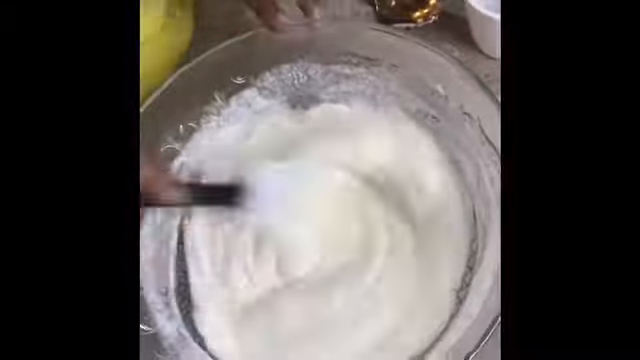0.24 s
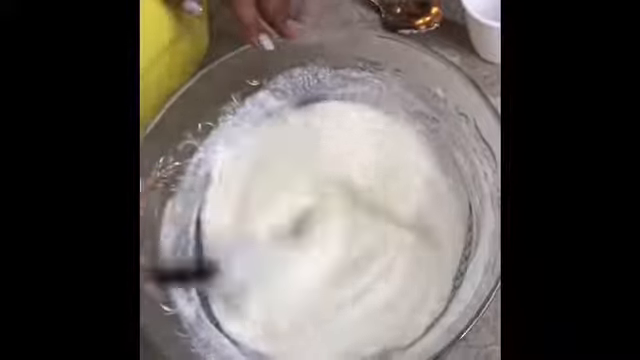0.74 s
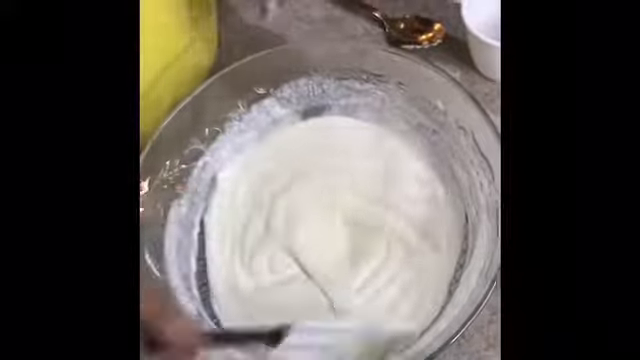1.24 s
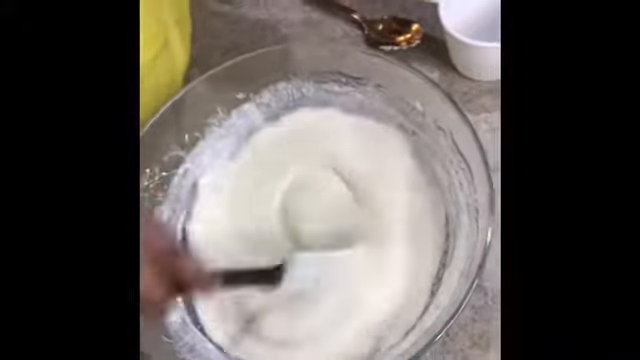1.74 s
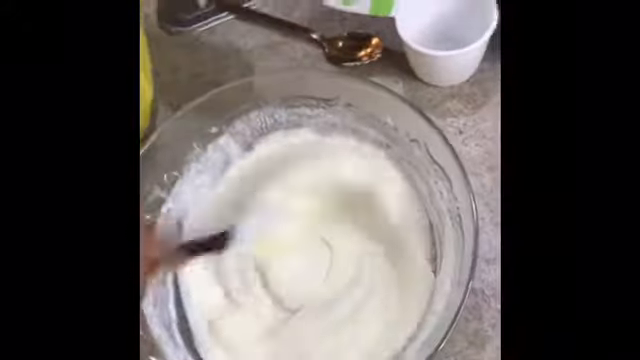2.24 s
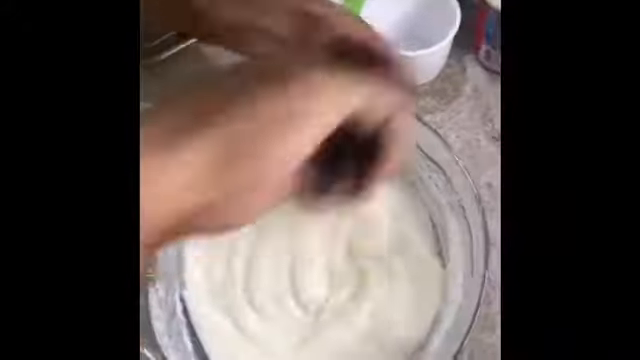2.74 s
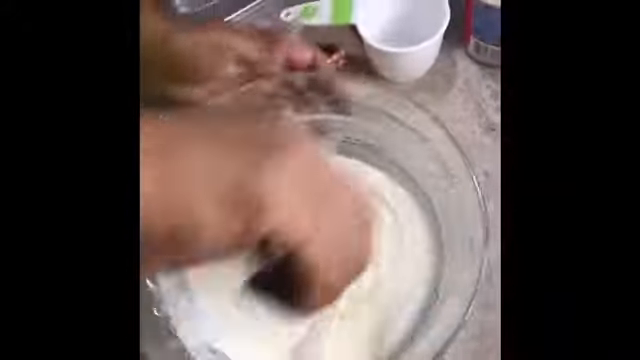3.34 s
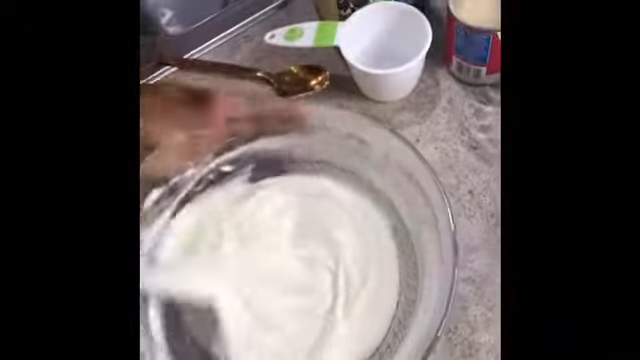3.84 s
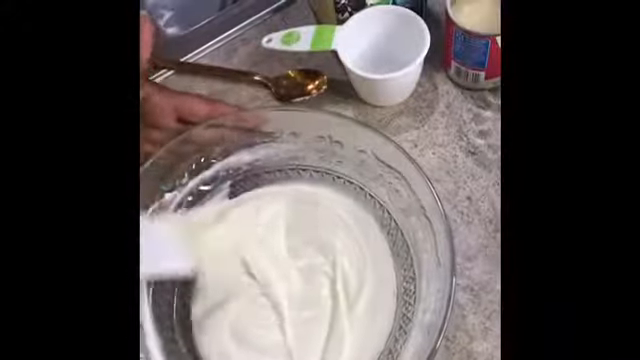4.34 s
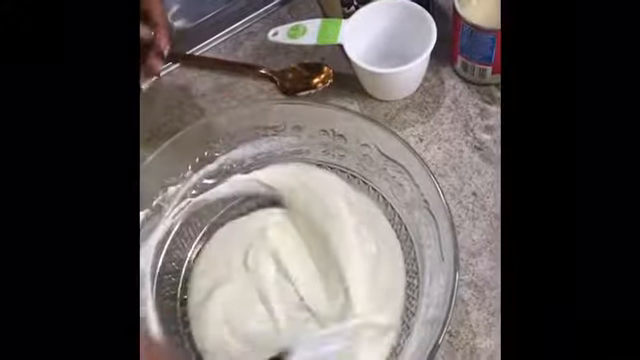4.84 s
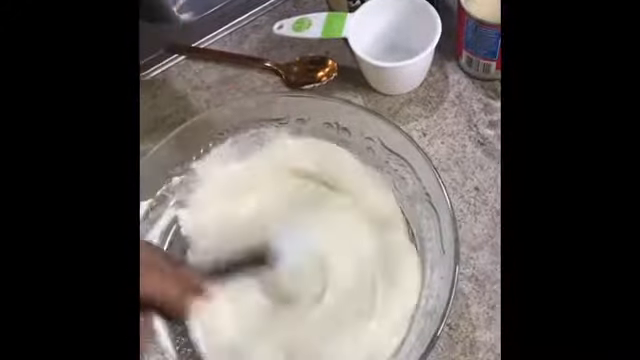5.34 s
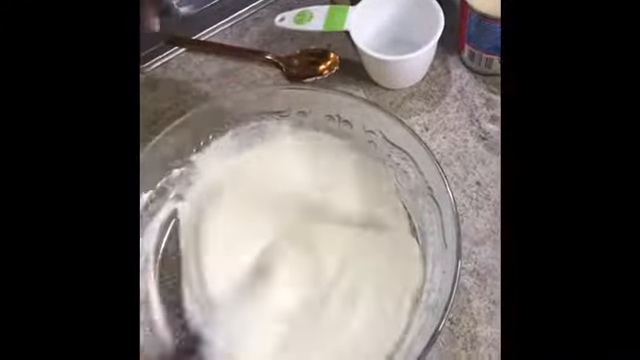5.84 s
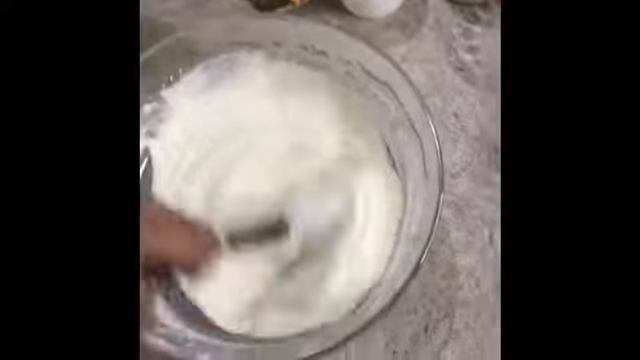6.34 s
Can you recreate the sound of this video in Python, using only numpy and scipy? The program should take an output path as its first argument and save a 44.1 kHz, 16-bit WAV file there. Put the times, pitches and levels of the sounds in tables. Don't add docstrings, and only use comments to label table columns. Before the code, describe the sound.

Close up in a small home kitchen, a spatula handle knocks a batter-damped glass bowl in irregular hollow clinks, mostly in the first two and a half seconds. Two soft rubbery scrapes follow mid-way, then one hardest knock and tiny wet smacks. The hand-held microphone thumps, rumbles and jolts over low hum, hiss and a high bird whistle.

```python
import sys
import numpy as np
from scipy import signal
from scipy.fft import rfft, irfft, next_fast_len
from scipy.io import wavfile
from scipy.ndimage import uniform_filter1d, map_coordinates

SR = 44100
rng = np.random.default_rng(int(sys.argv[2]) if len(sys.argv) > 2 else 0)


def persist_wave(psi):
    counts = np.round(np.clip(psi, -1, 1) * 32767).astype(np.int16)
    wavfile.write(sys.argv[1], SR, np.atleast_2d(counts).T)


def invert_db(x):
    u = np.asarray(x, float) / 20
    return 10 ** u


N = 290616
T = np.arange(N) / SR


def unit(x):
    return x / np.sqrt(np.mean(x ** 2) + 1e-20)


def along(points, hz):
    f, v = np.transpose(points)
    return np.interp(np.log(hz + .1), np.log(f + .1), v)


def curves(rows):
    s, *cols = np.transpose(rows)
    return [np.interp(T, s, c) for c in cols]


def wobble(rate):
    return map_coordinates(rng.standard_normal(400), [T * np.clip(rate, .1, 50)])


def filtered(x, response):
    m = next_fast_len(len(x) + SR // 2)
    return irfft(rfft(x, m) * response(np.fft.rfftfreq(m, 1 / SR)), m)[:len(x)]


def noise(spectrum):
    return unit(filtered(rng.standard_normal(N), lambda hz: invert_db(along(spectrum, hz))))


def streaky(spectrum, streak_db):
    z = signal.stft(noise(spectrum), nperseg=1024)[2]
    field = uniform_filter1d(rng.standard_normal(z.shape), size=2, axis=0)
    field = uniform_filter1d(field, size=16, axis=1)
    return unit(signal.istft(z * invert_db(streak_db * unit(field)), nperseg=1024)[1][:N])


def resonance(f, hz, width):
    return 1j * f * width / (hz * hz - f * f + 1j * f * width)


def add(track, s, x):
    part = track[round(s * SR):][:len(x)]
    part += x[:len(part)]


def kitchen(x, wet_db):
    # pitch_hz, t60_s
    decay = [(200, 0.65), (800, 0.3), (3000, 0.21), (10000, 0.2)]
    hz, t, z = signal.stft(rng.standard_normal(len(x)), SR, nperseg=256)
    fading = z * invert_db(-60 * t / along(decay, hz)[:, None])
    tail = signal.istft(fading, SR, nperseg=256)[1]
    late = np.pad(tail / np.linalg.norm(tail), (150, 0))
    return x + invert_db(wet_db) * signal.fftconvolve(x, late)[:len(x)]


def knocks():
    # ring_db, rattle_db, crack_db
    rim_hits = [
        (0.0872, -33, -4.5, -9, -17.5),
        (0.449, -20, -1, -8, -26),
        (0.7862, -31.5, -3, -0.5, -12.5),
        (1.72, -21.5, -4.5, -10.5, -37),
        (2.0624, -26, 2, -9.5, -22),
        (2.397, -25, -3.5, -6, -17),
        (5.249, -18, -4, -11.5, -33),
    ]
    # pitch_hz, width_hz, level_db
    modes = [(786, 66, 24), (546, 43, 0), (1154, 150, 7.5), (1613, 61, -5.5), (2460, 290, -1),
             (4600, 590, 2)]
    ring_hz, split_hz = 787, 48.6
    sag, sag_s = .1, 0.0393
    lowest_hz = 444
    contact_s = .0008

    def bowl(f):
        return sum((-1) ** k * invert_db(g) * resonance(f, c, w) for k, (c, w, g) in enumerate(modes))

    out, t = np.zeros(N), T[:SR // 2]
    click = np.arange(len(t)) == round(contact_s * SR)
    for s, db, ring_db, rattle_db, crack_db in rim_hits:
        push = -np.exp(-((t - contact_s) / .00008) ** 2)
        body = filtered(push, bowl)

        pitch = ring_hz * (1 - sag * (1 - np.exp(-t / sag_s)) + 0.026 * wobble(50)[:len(t)])
        turn = 2 * np.pi * np.cumsum(pitch) / SR
        pair = np.sin(turn) + .6 * np.sin(turn - 2 * np.pi * (split_hz * t + rng.random()))
        decay = invert_db(-22.5 - 60 * t / 0.34 + 1.25 * wobble(55)[:len(t)])
        linger = decay * pair * (1 - np.exp(-t / 0.0039)) ** 2

        grit = rng.standard_normal((2, len(t))) * (t > contact_s)
        chatter = grit[0] * invert_db(-60 * t / 0.0073) + 0.83 * click
        rattle = 1.5 * filtered(chatter, lambda f: resonance(f, 2900, 4600) ** 2)
        snap = click + .3 * grit[1] * invert_db(-60 * np.abs(t - contact_s) / .002)
        crack = filtered(snap, lambda f: resonance(f, 8000, 14000) ** 2)

        hit = invert_db(2) * push + invert_db(ring_db + 3.5) * (body / np.abs(body).max() + linger)
        hit += invert_db(rattle_db + 7) * rattle
        bright = invert_db(crack_db + 24) * kitchen(crack, wet_db=-13.0)
        add(out, s, invert_db(db) * (kitchen(hit, wet_db=-9.5) + bright))
    return filtered(out, lambda f: f ** 6 / (f ** 6 + lowest_hz ** 6))


def rocking():
    # start_s, length_s, level_db
    swells = [
        (.44, 0.14, -60.5),
        (1.72, 0.14, -63),
        (2.058, 0.22, -61),
        (2.39, 0.23, -64.5),
        (2.753, 0.099, -66),
        (4.798, 0.052, -62),
        (5.16, 0.31, -60.5),
    ]
    out = np.zeros(N)
    for s, length, db in swells:
        t = T[:round(length * SR)]
        swell = np.sin(np.pi * np.sqrt(t / length))
        add(out, s, invert_db(db + 4.0) * swell * np.sin(2 * np.pi * 452 * t))
    return out


def scrape():
    # start_s, hardest_s, end_s, rub_db, swish_db
    strokes = [
        (2.898, 3.248, 3.45, -57.5, -61.5),
        (3.547, 3.75, 3.97, -56.5, -62.5),
        (4.078, 4.284, 4.45, -65.5, -72),
    ]
    # pitch_hz, level_db (per Hz)
    rub_colours = [
        [(180, -47), (300, -1), (622, -3), (715, 3), (1070, -6), (1510, -1), (1820, -6.5), (2080, -16),
         (2800, -28), (3640, -51), (6160, -120)],
        [(180, -37), (300, -30), (375, 0), (541, -13), (582, -5), (879, -7), (983, -3.5), (1400, -13.5),
         (2800, -20.5), (3640, -35), (6160, -120)],
    ]
    # pitch_hz, level_db (per Hz)
    swish_colour = [(1650, -10), (2800, -4), (3590, 2), (3970, -4), (5560, -3), (7330, -19), (8930, -8),
                    (14000, -18), (16000, -12)]
    rub_hz, bend_hz = 1487, 150
    ease_db, swish_ease_db = 11, 13
    swish_lead_s = 0.053
    out = np.zeros(N)
    for (start, hard, end, rub_db, swish_db), colour in zip(strokes, rub_colours + rub_colours[1:]):
        press = np.interp(T, [start, hard, end], [0, 1, 0])
        speed = np.interp(T + swish_lead_s, [start, hard, end], [0, 1, 0])
        fade = np.clip(np.minimum(T - start, end - T) / 0.05, 0, 1)

        grains = rng.standard_normal(N) * invert_db(4.4 * rng.standard_normal(N))
        broad = unit(filtered(grains, lambda f: invert_db(along(colour, f))))
        carrier = np.cos(2 * np.pi * np.cumsum(rub_hz + bend_hz * press) / SR)
        band = unit(noise([(1, 18.5), (90, 0), (300, -17), (900, -120)]) * carrier)
        rub = invert_db(rub_db - ease_db * (1 - press)) * (invert_db(3.0) * broad + invert_db(-5.0) * band)

        swish = unit(filtered(grains, lambda f: invert_db(along(swish_colour, f))))
        swish = invert_db(swish_db - swish_ease_db * (1 - speed)) * swish
        out += fade * invert_db(1.2 * wobble(40)) * (rub + swish)
    return out


def smacks():
    # start_s, peak_db, pitch_hz,
    # sharpness_q
    pops = [(0.39, -52, 7160, 0.48), (1.082, -43, 7500, 0.4), (1.1386, -55, 7490, 1.2),
            (1.226, -49, 7200, 1), (1.5878, -54, 9300, 2.4), (1.696, -56, 7630, 1.8),
            (1.7374, -50, 8650, 2), (2.0875, -46, 7750, 1.1), (2.3625, -58, 8910, 2.6),
            (3.061, -41, 8800, 3.3), (5.27, -43, 8400, 3.3), (5.5887, -46.5, 8640, 2.5),
            (5.6298, -46, 9200, 3), (5.689, -45, 9150, 1.6), (5.912, -50, 8100, 4), (5.922, -54, 9200, 2),
            (6.2794, -58, 7260, 1.3), (6.5085, -44, 8750, 2.5),
            (1.6242, -52, 5570, 2),
        (2.0622, -42, 4400, 4),
        (2.403, -37.5, 4800, 3.1),
        (2.4447, -53, 4770, 1.6),
        (2.849, -43, 3360, 0.62),
        (4.3446, -44, 4600, 4.4),
        (4.542, -56, 684, .7),
        (5.2704, -44.5, 5570, 1.9),
        (5.453, -51, 4080, 4.7),
        (5.5935, -53, 3540, 1.6),
            (0.91, -70, 1630, 49), (2.287, -54.5, 1200, 1.5), (2.46, -53, 1160, 2.7),
             (3.414, -55, 2134, 1.4), (4.047, -60.5, 1140, 4.9), (5.589, -46.5, 1500, 0.42),
             (5.596, -42, 1380, 0.58), (5.598, -58, 780, 11), (5.630, -56.5, 1770, 3.4),
             (5.70, -62, 1210, 5), (5.74, -58, 1100, 1.8), (5.797, -56.5, 880, 7.3),
             (5.798, -62.5, 1650, 8), (5.808, -58.5, 1750, 8.8), (5.819, -58, 1490, 6),
             (5.923, -50, 2500, 0.5)]
    out, t = np.zeros(N), T[:SR // 4]
    for s, db, hz, sharpness in pops:
        spit = (t == 0) + 0.073 * rng.standard_normal(len(t)) * np.exp(-t / 0.0013)
        width = hz / np.clip(sharpness, .3, 40)
        burst = filtered(spit, lambda f: resonance(f, hz, width) ** 2)
        add(out, s + 0.00092, invert_db(db + 6.5) * kitchen(burst / np.abs(burst).max(), wet_db=-11))
    return out


def hand():
    # start_s, peak_db, pitch_hz
    thumps = [(0.445, -38, 94), (1.549, -49, 123), (1.891, -54, 86.1), (2.447, -48, 90.5), (3.005, -52, 89),
              (3.64, -46.5, 88), (3.22, -44.5, 150), (3.757, -42.5, 150), (3.849, -48, 130),
              (4.095, -67, 86.6), (4.598, -60, 70), (4.75, -56, 120), (4.969, -48, 73), (5.317, -39.5, 100),
              (5.611, -53, 86), (5.957, -45, 101), (6.298, -53, 85.5)]
    out, t = np.zeros(N), T[:SR // 8]
    for s, db, hz in thumps:
        u = t * hz / 0.98
        puff = unit(filtered(rng.standard_normal(len(t)), lambda f: resonance(f, 2.03 * hz, 570) ** 2))
        swing = np.sin(2 * np.pi * hz * t)
        add(out, s, invert_db(db + 4) * u * np.exp(-u) * (swing + 0.37 * puff))
    return out


def jolts():
    # start_s, step (pressure), rise_ms, return_ms
    slips = [
        (1.755, -0.074, 1.7, 19),
        (2.295, -0.0094, 1.2, 23),
        (2.7432, -0.038, 0.0091, 1.4),
        (2.785, -0.019, 0.49, 7.6),
        (2.813, -0.027, 0.64, 4.4),
        (2.849, 0.043, 0.39, 11),
        (2.854, -0.086, 1.6, 9.7),
        (4.54, 0.045, 0.73, 27),
        (4.5429, -0.00022, 0.13, 15),
        (4.56, -0.11, 5, 25),
    ]
    lead_s = .01
    out, t = np.zeros(N + SR), T[:SR // 4] - lead_s
    for s, step, rise_ms, back_ms in slips:
        u = 1000 * t / rise_ms
        rise = (1 + np.tanh(u)) / 2
        leak = np.exp(-np.logaddexp(0, u) * rise_ms / back_ms)
        add(out, s - lead_s, step * rise * leak)
    return out[:N]


def arm_sway():
    # start_s, sway_db, grip_db
    arm_moves = [(0, -26.5, -54), (.5, -21, -48.5), (.85, -21.5, -52), (1.35, -18.5, -56), (1.7, -31, -54),
                 (2.2, -24, -45), (2.55, -23, -56.5), (3.05, -34, -51.5), (3.3, -35.5, -59),
                 (3.7, -32, -57), (4.3, -37, -58.5), (4.55, -25.5, -52.5), (5.25, -31, -47.5),
                 (5.8, -22, -51.5), (5.97, -34.5, -48), (6.12, -19, -47), (6.59, -22, -50)]
    # pitch_hz, level_db (per Hz)
    sway_colour = [(.5, -37), (2, -0.5), (4, 5.5), (7, -16), (12, -17), (20, -9.5), (30, -120)]
    # pitch_hz, level_db (per Hz)
    grip_colour = [(12, -44), (22, 6.5), (40, -8), (80, -15.5), (150, -28), (300, -36), (500, -120)]
    sway_db, grip_db = curves(arm_moves)
    arm = np.sqrt(2) * np.sin(2 * np.pi * np.cumsum(3.4 + 1.1 * wobble(2)) / SR)
    sway = invert_db(np.minimum(sway_db, -16)) * unit(arm + .5 * noise(sway_colour))
    rumble = invert_db(grip_db + 5.5 + 3.3 * wobble(12)) * noise(grip_colour)
    low = 0.36 * np.tanh(sway / 0.25) + rumble
    return low * np.clip((T[-1] - T) / .05, 0, 1)


def room_tone():
    # pitch_hz, level_db (per Hz)
    hum_colour = [(59, -22), (100, -1.5), (223, -7), (286, -5), (496, -12), (595, -10.5), (1030, -19.5),
                  (1380, -22.5), (1720, -26), (2300, -34), (2990, -28), (5060, -120)]
    # pitch_hz, level_db (per Hz)
    hiss_colour = [(1060, -17), (1800, -13.5), (2120, -4.5), (3610, 3), (4170, 2), (5910, 3), (8280, -6.5),
                   (15100, -10), (16000, -10.5)]
    # start_s, end_s, pitch_hz, level_db, width_hz
    whines = [
        (0, 5.2, 1385, -78, 20),
        (1.4, 2.9, 9400, -83, 90),
        (1.5, 3.3, 8600, -84, 60),
        (2.3, 3.2, 8950, -83, 60),
        (3.3, 4.3, 9550, -84, 60),
        (3.8, 5.3, 8820, -81, 40),
        (4.0, 5.0, 9050, -80, 40),
        (5.3, 6.0, 9600, -83, 60),
    ]
    hum_db, hiss_db, rise_db, rise_s = -58, -70, 6, 4.35
    hiss_level_db = hiss_db + rise_db * np.clip(T / rise_s, 0, 1)
    room = invert_db(hum_db + 1.1 * wobble(5)) * streaky(hum_colour, streak_db=2.6)
    room += invert_db(hiss_level_db + 1.5 + .8 * wobble(9)) * streaky(hiss_colour, streak_db=2.4)
    for start, end, hz, db, width in whines:
        fade = np.clip(np.minimum(T - start, end - T) / 0.16, 0, 1)
        swell = invert_db(db - 0.5 + 3.9 * wobble(9)) * fade
        room += swell * unit(filtered(rng.standard_normal(N), lambda f: resonance(f, hz, width) ** 2))
    return room


def bird():
    # start_s, trill_db, note_db, pitch_hz
    calls = [
        (.46, -69, -45, 7480),
        (0.946, -69, -46, 7470),
        (1.991, -72, -54, 7440),
        (3.49, -68, -53, 7400),
        (3.919, -71, -64, 7200),
        (4.92, -70, -55, 7400),
        (6.03, -68, -67, 7400),
    ]
    out, t = np.zeros(N), T[:SR // 4]
    for s, trill_db, note_db, hz in calls:
        buzz = unit(filtered(rng.standard_normal(len(t)), lambda f: resonance(f, hz, 530) ** 2))
        trill = np.sin(np.pi * np.clip(t / 0.097, 0, 1)) * buzz
        u = np.clip(t - .093, 0, 1)
        pitch = hz * (1.02 - 0.44 * np.exp(-u / 0.00264))
        swell = u / 0.05 * np.exp(1 - u / 0.0097)
        note = swell * np.sin(2 * np.pi * np.cumsum(pitch) / SR)
        add(out, s, kitchen(invert_db(trill_db) * trill + invert_db(note_db) * note, wet_db=-8))
    return out


def scene():
    stirring = knocks() + rocking() + scrape() + smacks()
    holding = hand() + jolts() + arm_sway()
    return (stirring + holding + room_tone() + bird())[None]


def band_limit(x):
    return signal.sosfilt(signal.butter(12, 16920, fs=SR, output="sos"), x)


def record(dry):
    # start_s, peak_db
    dropouts = [
        (0.1737, -20),
        (1.498, -22),
        (4.1457, -35.5),
        (5.469, -29),
    ]
    # pitch_hz, level_db
    mic = [(8000, 0.5), (12000, -3.5), (15400, -5.5), (15900, -24), (16850, -15), (17100, -90)]
    glitch = np.zeros(N)
    for s, db in dropouts:
        add(glitch, s + 0.00117, -invert_db(db + 4) * np.array([.45, 1, .6]))
    mix = filtered(dry[0] + glitch, lambda hz: invert_db(along(mic, hz)))[None]
    return band_limit(mix)


dry = scene()
out = record(dry)
persist_wave(out)
```